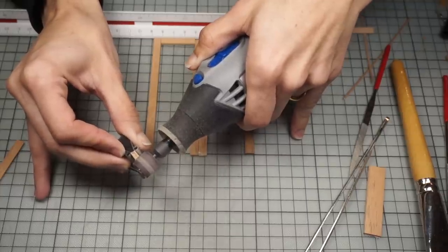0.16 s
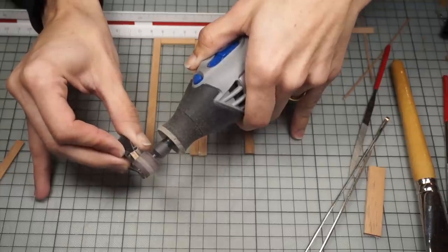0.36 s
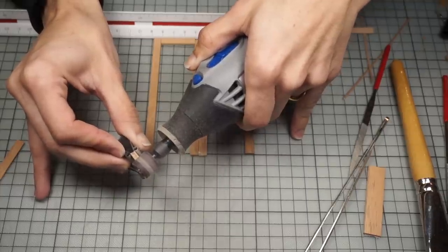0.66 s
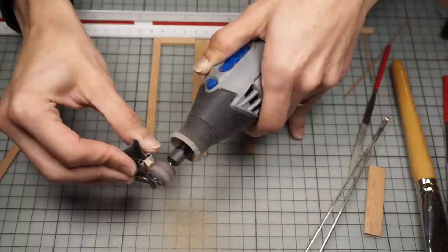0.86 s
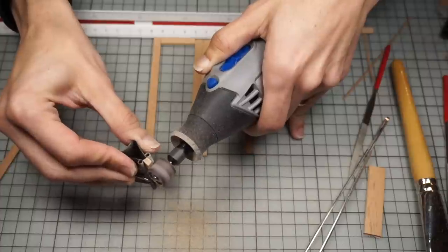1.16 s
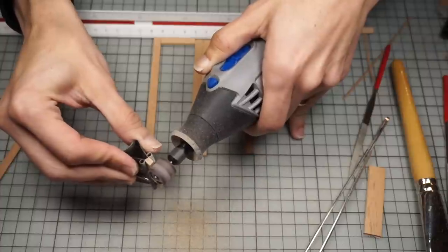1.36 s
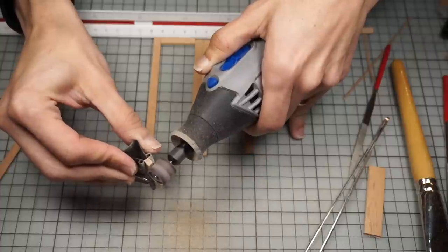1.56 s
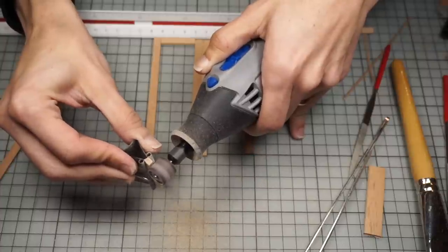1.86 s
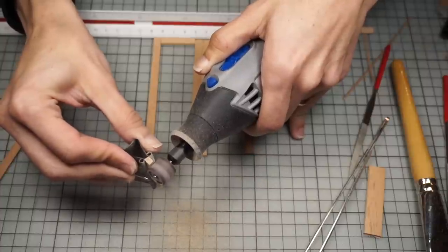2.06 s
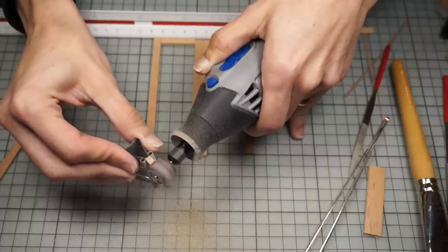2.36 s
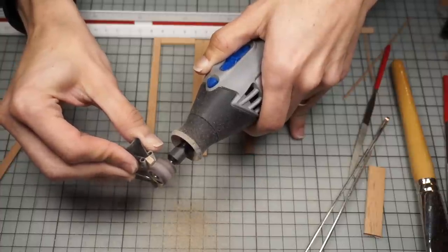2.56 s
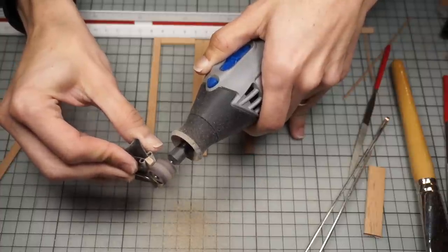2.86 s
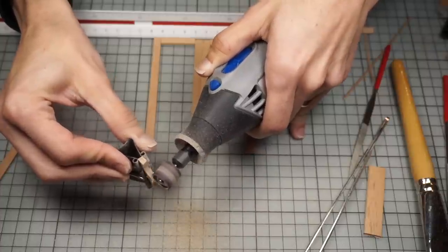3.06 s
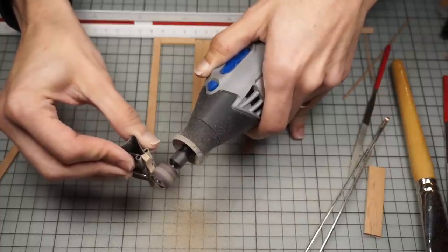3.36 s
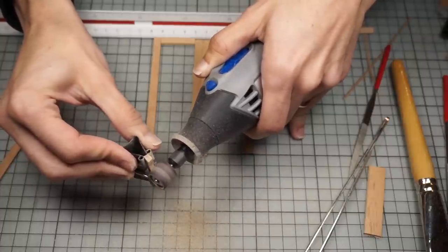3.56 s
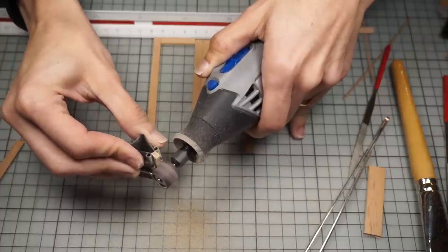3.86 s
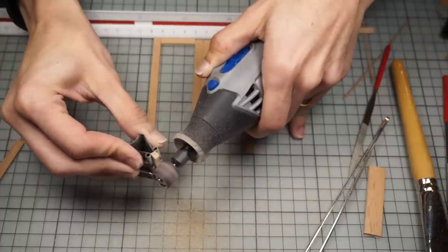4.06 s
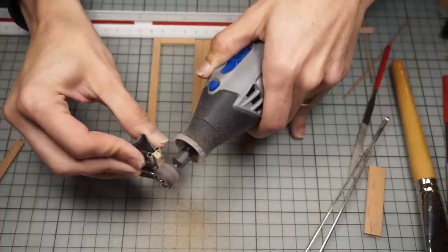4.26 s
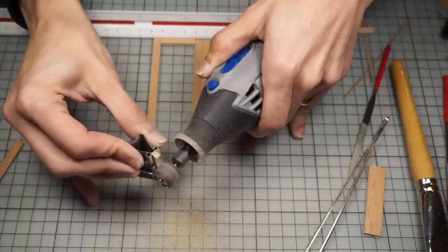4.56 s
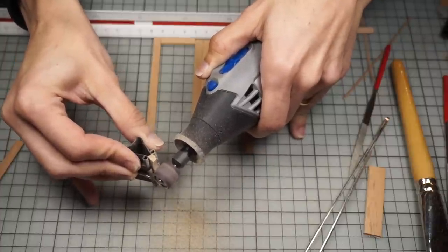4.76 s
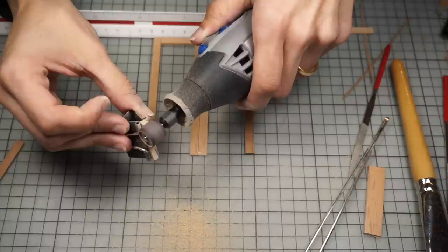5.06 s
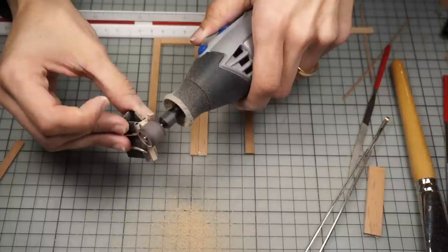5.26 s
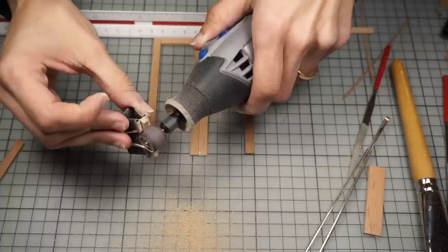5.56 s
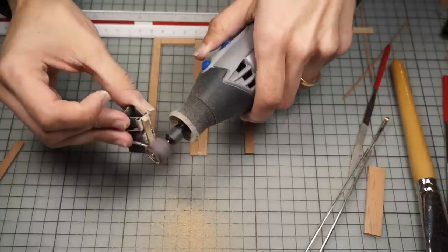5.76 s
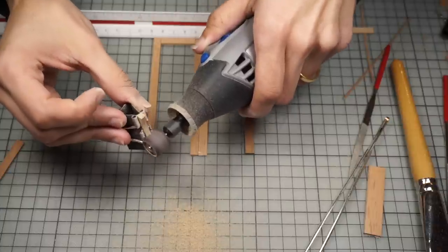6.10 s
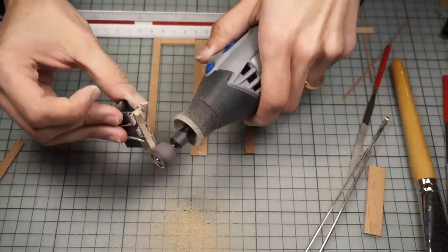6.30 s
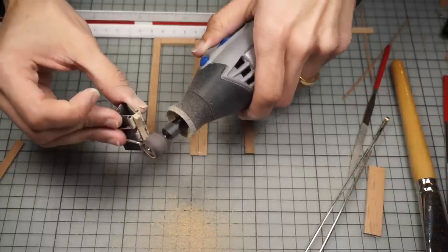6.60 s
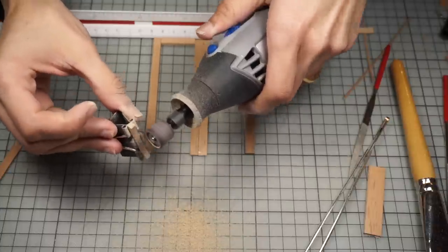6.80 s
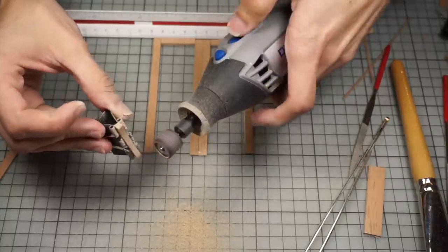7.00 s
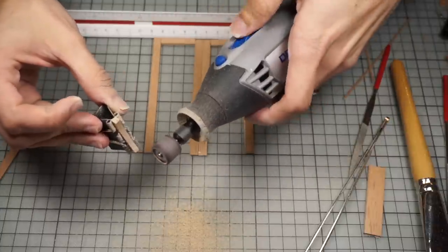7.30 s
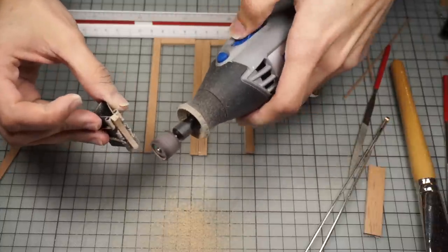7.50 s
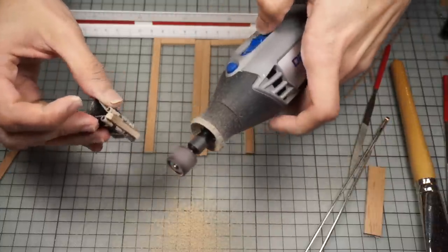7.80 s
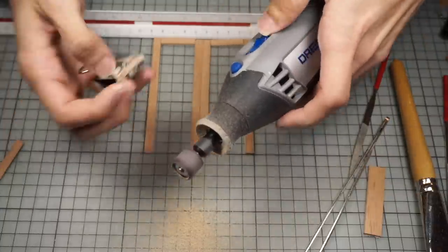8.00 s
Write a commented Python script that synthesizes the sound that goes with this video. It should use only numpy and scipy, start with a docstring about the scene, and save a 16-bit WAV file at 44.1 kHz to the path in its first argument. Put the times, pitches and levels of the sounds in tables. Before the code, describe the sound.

Close by and somewhat left, in a quiet room, a small electric rotary tool grinds a piece of wood. Its buzzing motor dips and climbs under firm presses while the drum hisses, scrapes and briefly squeaks. After some lighter, higher-pitched touches the sanding stops, leaving a bright whine. Near the end the switch clicks off and the whine starts falling.

```python
"""A mains rotary tool sands a small wooden part, hand-held over a desk; chopped mains makes it buzz.
The drum's grit comes round every turn, hissing and ringing the part. At 0.77 s the tone changes abruptly.
Hard presses slow the motor and make the part chatter and squeal; from 5.1 s the touches are lighter.
At 6.8 s the drum runs free and the motor whines. At 7.6 s it is switched off and starts to coast down."""
import sys
import numpy as np
from scipy import signal
from scipy.fft import rfft, irfft, next_fast_len
from scipy.io import wavfile
from scipy.ndimage import uniform_filter1d

SR = 44100
rng = np.random.default_rng(int(sys.argv[2]) if len(sys.argv) > 2 else 0)


def store_wav(level_fs):
    """Save 16-bit WAV to argv[1]."""
    pcm = np.round(np.clip(np.atleast_2d(level_fs), -1, 1) * 32767)
    wavfile.write(sys.argv[1], SR, pcm.T.astype(np.int16))


N = 358974
TIME = np.arange(N) / SR
PADDED = next_fast_len(N + SR // 2)
FREQS = np.maximum(np.arange(PADDED // 2 + 1) * SR / PADDED, 1)
MAINS_HZ = 50
TONE_CHANGE_S, FREE_S, FREE_FADE_S, SWITCH_OFF_S = 0.77, 6.835, 0.09, 7.61
COAST_S = np.maximum(TIME - SWITCH_OFF_S, 0)


def from_db(db):
    """dB to gain."""
    return 10 ** (np.asarray(db) / 20)


def rms_one(x):
    """Scale to rms 1."""
    return x / np.sqrt(np.mean(x ** 2) + 1e-20)


def evened(x):
    """Hold the running power near 1."""
    return x / np.sqrt(np.maximum(uniform_filter1d(x ** 2, 3000), 1e-12))


def drift(rate_hz):
    """Random curve, rms 1."""
    knots = rng.standard_normal(int(N / SR * rate_hz) + 2)
    return rms_one(np.interp(TIME * rate_hz, np.arange(len(knots)), knots))


def after(t_s, fade_s=0.02):
    """Ramp 0 to 1, centred on t_s."""
    return np.clip((TIME - t_s) / fade_s + .5, 0, 1)


def over_hz(points):
    """Interpolate on log frequency."""
    hz, value = np.transpose(points)
    return np.interp(np.log(FREQS), np.log(hz), value)


def filtered(x, gain_db):
    """Apply a gain per frequency."""
    return irfft(rfft(x, PADDED) * from_db(gain_db), PADDED)[:N]


def coloured(x, spectrum):
    """Shape by a spectrum with 60 dB/octave skirts; rms 1."""
    octaves_below = np.maximum(np.log2(spectrum[0][0] / FREQS), 0)
    octaves_above = np.maximum(np.log2(FREQS / spectrum[-1][0]), 0)
    return rms_one(filtered(x, over_hz(spectrum) - 60 * (octaves_below + octaves_above)))


def ringing(force, hz, width_hz):
    """One resonance; rms 1."""
    r = np.exp(-np.pi * width_hz / SR)
    return rms_one(signal.lfilter([1, 0, -1], [1, -2 * r * np.cos(2 * np.pi * hz / SR), r * r], force))


def surface(turns, wear_rad, patchy_db=3.2, memory=0.92, points=512):
    """Rough track that repeats each turn and slowly wears; order = multiple of the spindle speed."""
    orders = np.arange(80)
    steps, swells = rng.standard_normal((2, int(turns[-1]) + 2, len(orders)))
    angles = 2 * np.pi * rng.random(len(orders)) + np.cumsum(steps * wear_rad * np.sqrt(orders), axis=0)
    heights = from_db(patchy_db * rms_one(signal.lfilter([1], [1, -memory], swells, axis=0)))
    track = irfft(heights * np.exp(1j * angles) * (orders > 0), points, axis=1).ravel()
    return rms_one(np.interp(turns * points, np.arange(len(track)), track))


def rubbing(turns, share, wear_rad):
    """Friction force: a share of the power repeats each turn, the rest is noise."""
    return np.sqrt(share) * surface(turns, wear_rad) + np.sqrt(1 - share) * rng.standard_normal(N)


def chopped(depth_db, firing=0.013, rise=0.13, fall=0.18):
    """Gain pulse from the current, once per mains half wave (times in half waves); mean power 1."""
    age = (2 * MAINS_HZ * TIME - firing) % 1
    pulse = np.minimum(age / rise, 1) * np.exp(-(np.maximum(age - rise, 0) / fall) ** 2)
    gain = from_db(depth_db * pulse)
    return gain / np.sqrt(uniform_filter1d(gain ** 2, SR // MAINS_HZ))


def rotor_tone(turns, order, ripple_rad, wobble_rad):
    """One order, swung in phase by the pulsing torque."""
    swing = ripple_rad * np.sin(2 * np.pi * 2 * MAINS_HZ * TIME) + wobble_rad * drift(60)
    return np.sqrt(2) * np.sin(2 * np.pi * order * turns + swing)


def spindle_hz(friction_hz_per_s=153):
    """Speed sags under load; unpowered, friction runs it down evenly."""
    # powered speed: t/s, f/Hz
    speeds = [(0, 151.9), (0.325, 150.3), (0.55, 152.4), (0.65, 151.2), (0.765, 153.7), (0.78, 160.3),
              (0.875, 160.2), (1.0, 174.8), (1.15, 183.2), (1.275, 184.1), (1.4, 178.0), (1.5, 169.6),
              (1.625, 161.9), (1.75, 155.9), (1.825, 155.7), (1.9, 152.5), (2.075, 149.1), (2.175, 149.4),
              (2.25, 152.4), (2.375, 153.9), (2.65, 150.2), (2.725, 151.6), (2.8, 150.0), (2.95, 152.9),
              (3.0, 156.2), (3.05, 161.2), (3.125, 171.5), (3.25, 180.2), (3.425, 184.9), (3.5, 183.8),
              (3.7, 171.8), (3.85, 164.5), (4.1, 161.6), (4.25, 162.6), (4.5, 168.1), (4.675, 164.9),
              (4.825, 168.5), (5.085, 171.8), (5.1, 191.8), (5.475, 192.4), (5.8, 190.3), (5.975, 191.9),
              (6.275, 186.7), (6.65, 193.6), (6.725, 192.0), (7.25, 197.6), (7.61, 197.9)]
    return np.interp(TIME, *np.transpose(speeds)) - friction_hz_per_s * COAST_S


def effort(speed_hz, free_hz=194.7, slow_hz=147, full_hz_per_s=44):
    """Motor labour and acceleration, both 0-1."""
    labour = np.clip((free_hz - speed_hz) / (free_hz - slow_hz), 0, 1) * (1 - after(SWITCH_OFF_S))
    pickup = np.clip(np.gradient(speed_hz) * SR / full_hz_per_s, 0, 1)
    return labour, uniform_filter1d(pickup, 4000)


def pressing(idle_ring_db=-45.5, idle_hiss_db=-48, idle_bite_db=12.5):
    """Base curves from the hand's pressure; bite is the chop depth, of which each layer takes a share."""
    # part on drum: start/s, end/s, attack/s, release/s, contact/0-1, ring/dB, first grit/dB,
    # last grit/dB, housing boost/dB, chatter/dB re ring, bite/dB
    presses = [(-0.1, 0.771, .02, 0.018, 0.55, -40.5, -37, -37, 3, -28, 9),
               (0.771, 0.962, 0.019, 0.023, 0.9, -39, -40.5, -40, 2, 0, 7),
               (1.148, 2.146, 0.011, 0.071, 0.82, -38.5, -41.5, -39, 1.5, -1, 9),
               (2.146, 2.974, 0.055, 0.05, 0.8, -40, -40.5, -40, 1, -43, 3),
               (2.97, 3.072, 0.045, 0.019, 0.9, -35.5, -41.5, -36, 1.5, -4, 7),
               (3.407, 4.325, 0.096, 0.23, 0.92, -38.5, -38, -39, 0.5, -8, 0),
               (4.37, 5.08, 0.2, .012, 0.84, -37.5, -41, -42.5, -.5, -13.5, 5),
               (5.085, 5.5, .012, 0.12, 0.27, -45, -44.5, -46.5, -0.5, -2.5, 13),
               (5.533, 5.836, 0.26, 0.13, 0.12, -43, -41, -43, -0.5, -5, 14),
               (5.912, 6.16, .04, 0.031, 0.08, -42, -42.5, -44.5, 1.5, -3.5, 14.5),
               (6.15, 6.283, 0.13, 0.06, 0.5, -37, -41.5, -39.5, 1.5, -8, 14),
               (6.62, 6.713, .03, 0.062, 0.34, -43.5, -44, -41.5, 2, -9, 15)]
    resting = 0.22 * (1 - after(FREE_S, FREE_FADE_S))   # light contact between presses
    contact, boost_db, judder = resting, 0, 0
    ring_db, grit_db, bite_db = idle_ring_db, idle_hiss_db, idle_bite_db
    for start, end, attack, release, firm, ring, first, last, boost, chatter_db, bite in presses:
        on = after(start, attack) * (1 - after(end, release))
        contact = contact + on * (firm - resting)
        ring_db += on * (ring - idle_ring_db)
        grit_db += on * (np.interp(TIME, [start, end], [first, last]) - idle_hiss_db)
        boost_db += on * boost
        judder += on * from_db(ring + chatter_db)
        bite_db += on * (bite - idle_bite_db)
    return np.clip(contact, 0, 1), ring_db, grit_db, boost_db, judder, bite_db


def rumble():
    """Faint low stereo background."""
    # spectrum: f/Hz, level/dB
    spectrum = [(15, -46), (25, -1), (113, -2.5), (171, 5.5), (236, -5), (300, 6.5), (390, -27),
                (660, -120)]
    centre, sides = (coloured(rng.standard_normal(N), spectrum) for _ in range(2))
    return from_db(-74) * (centre + .45 * sides * [[1], [-1]])


def room(x, t60_s=0.61, wet_db=-15, spill_db=-19):
    """Diffuse desk and wall reflections, spilling across channels."""
    tail = rng.standard_normal((2, SR // 2)) * from_db(-60 * TIME[:SR // 2] / t60_s)
    tail /= np.sqrt(np.sum(tail ** 2, axis=1, keepdims=True))
    direct = rfft(x, PADDED)
    reflected = from_db(wet_db) * direct + from_db(spill_db) * direct[::-1]
    return irfft(direct + reflected * rfft(tail, PADDED), PADDED)[:, :N]


def off_centre(x):
    """The tool lies to the left: the sides differ in level and phase."""
    # left minus right: f/Hz, level/dB
    balance = [(100, -0.5), (340, 0.5), (600, 2), (1080, 4.5), (1900, 3.5), (2700, 7.5), (4300, 13),
               (5100, 11.5), (6200, 16.5), (10500, 15.5)]
    # left lead: f/Hz, phase/rad
    lead = [(60, -0.45), (250, -1.3), (520, -1.64), (2500, -1.31), (3790, -1.7), (4820, -1.46),
            (7060, -1.2), (11000, -1.3)]
    sides = np.array([[.5], [-.5]])
    gains = from_db(sides * over_hz(balance)) * np.exp(1j * sides * over_hz(lead))
    return irfft(rfft(x, PADDED) * gains / np.abs(gains.mean(axis=0)), PADDED)[:, :N]


def hum(turns, speed_hz, early_db=-73, late_db=-84):
    """Magnetic hum: mains overtones, some shifted by the rotor, until power-off."""
    # hum lines: order, plus mains multiple, level/dB
    lines = [(1, 2, -78.5), (1, 4, -66), (0, 8, -73), (0, 12, -73), (0, 14, -65)]
    powered = 1 - after(SWITCH_OFF_S)
    current = powered * (speed_hz.mean() / speed_hz) ** 2.5   # a slowed motor draws more
    drone_db = early_db + (late_db - early_db) * after(TONE_CHANGE_S, .05)
    out = from_db(drone_db) * powered * np.sin(2 * np.pi * 2 * MAINS_HZ * TIME)
    for order, mains, db in lines:
        tone = np.sin(2 * np.pi * (order * turns + mains * MAINS_HZ * TIME))
        out += from_db(db + 2 * drift(3.7)) * tone * current
    return np.sqrt(2) * out


def switch(level_db=-38, t60_s=0.055):
    """The slide switch snaps off."""
    # tick spectrum: f/Hz, level/dB
    spectrum = [(1500, -11), (8300, -5), (9200, 6), (10200, -3)]
    tick = coloured(rng.standard_normal(N), spectrum)
    return tick * (TIME > SWITCH_OFF_S) * from_db(level_db - 60 * COAST_S / t60_s)


def fan(turns, contact, bite_db):
    """Rush of fan air, pulsed by the current; power 1."""
    # air spectrum: f/Hz, level/dB
    spectrum = [(150, -19), (300, -17.5), (450, -11.5), (620, -6), (880, -1.5), (1050, -6), (1450, 0.5),
                (1950, -20)]
    air = rubbing(turns, 0.11 + 0.2 * contact, wear_rad=0.087) * chopped(0.14 * bite_db)
    return evened(coloured(air, spectrum))


def housing(turns, contact, bite_db):
    """The rotor shakes the housing in bursts; its colour shifts abruptly at 0.77 s."""
    # housing response before and after 0.77 s: f/Hz, level/dB
    early_tone = [(1180, -23), (2000, -5), (2100, -2), (2380, 2), (2540, -32), (2700, -2), (2860, -14),
                  (3300, -21), (4290, -41), (7260, -120)]
    late_tone = [(1210, -55), (2050, -1.5), (2200, 4), (2380, 4), (2690, 0), (2800, 1.5), (3080, -8.5),
                 (3300, -21), (4290, -28), (7260, -120)]
    force = rubbing(turns, 0.11 + 0.42 * contact, wear_rad=0.039)
    changed = after(TONE_CHANGE_S)
    shake = (1 - changed) * coloured(force, early_tone) + changed * coloured(force, late_tone)
    return evened(shake) * chopped(0.34 * bite_db)


def buzz(turns, labour, boost_db, sweep_hz=1150):
    """Each current burst sounds the 16th order as a falling chirp through the housing."""
    # housing response before and after 0.77 s: f/Hz, level/dB
    early_tone = [(1900, -9), (2110, 6), (2220, 2.5), (2420, 1.5), (2520, -19), (2620, 0.5), (2720, 0),
                  (2830, -15), (3300, -18)]
    late_tone = [(2000, 5), (2300, -11.5), (2450, 0.5), (2560, -4), (2720, 4), (2850, -1.5), (2970, -5),
                 (3100, -15.5), (3400, -7.5)]
    # overtones at full labour: order, level/dB
    overtones = [(24, -52.5), (32, -53.5)]
    age = (2 * MAINS_HZ * TIME - 0.17 + .5) % 1 - .5   # half waves from mid-burst
    swing = -np.pi * sweep_hz * age ** 2 / (2 * MAINS_HZ) + 0.23 * drift(70)
    chirp = np.sin(2 * np.pi * 16 * turns + swing)
    bursts = rms_one(np.exp(-(age / 0.24) ** 2) * from_db(1.5 * drift(40)) * chirp)
    changed = after(TONE_CHANGE_S)
    out = (1 - changed) * filtered(bursts, over_hz(early_tone))
    out += changed * filtered(bursts, over_hz(late_tone))
    out *= from_db(-48.5 + 9.5 * labour + boost_db)
    for order, db in overtones:
        out += from_db(db) * labour * rotor_tone(turns, order, 0.8, 1.2) * chopped(6.0)
    return out * (1 - after(SWITCH_OFF_S))


def whine(turns, speed_hz, bite_db, corner_hz=1990):
    """Rotor slots pass 12 times a turn, commutator edges 24; both swell once the drum runs free."""
    # commutator tones: order, level/dB re edges_db, coasting fall/(dB/s)
    overtones = [(24, 1.5, 51), (25, -20, 40), (32, -13, 33), (33, -9, 40), (47, -5.5, 41), (48, -4, 23),
                 (49, -2.5, 12), (56, -36, 15), (63, -15, 6), (62, -9, -3), (67, -12, 4)]
    # low rotor tones: order, loaded/dB, free/dB, coasting fall/(dB/s)
    rotor = [(1, -84, -67.5, 17), (8, -53.5, -48.5, 156), (9, -56.5, -58, 150)]
    free = after(FREE_S, FREE_FADE_S)
    damped_db = -16 * (1 - free)
    octaves_below = np.maximum(np.log2(corner_hz / (12 * speed_hz)), 0)   # housing radiates little there
    slots_db = -39.5 + damped_db - np.minimum(120 * octaves_below, 20)
    edges_db = -50.5 + damped_db
    angle = 2 * np.pi * turns + 0.015 * drift(50)
    angle += 0.028 * after(SWITCH_OFF_S, 0.061) * drift(250)   # coasting is less even
    out = from_db(slots_db + .7 * drift(25)) * np.sin(12 * angle)
    for order, db, fall in overtones:
        gain = from_db(edges_db + db - fall * COAST_S + drift(25))
        out += gain * np.sin(order * angle + 2 * np.pi * rng.random())
    for order, load_db, free_db, fall in rotor:
        gain = from_db(load_db + free * (free_db - load_db) - fall * COAST_S + drift(20))
        out += gain * np.sin(order * angle)
    return np.sqrt(2) * out * chopped(0.41 * bite_db)


def brushes(turns, force, contact, bite_db):
    """Motor brushes hiss, and whistle with the bite until the drum runs free."""
    # hiss spectrum: f/Hz, level/dB
    spectrum = [(1820, -25), (3100, -5.5), (3500, -5), (3800, -7.5), (4260, -9.5), (4440, -2.5),
                (5020, -6.5), (6270, -3.5), (8000, -6), (8900, -3.5), (11000, -13), (14300, -100)]
    sparks = rotor_tone(turns, 24, 0.98, 1.6) + .5 * rotor_tone(turns, 32, 0.42, 1.0)
    draw = (bite_db / bite_db.max()) ** 2 * (1 - after(FREE_S, FREE_FADE_S))
    whistle = 0.98 * draw * (1 - contact) * sparks * chopped(0.61 * bite_db)
    return coloured(force, spectrum) + whistle


def grit(force):
    """Grit rasps the wood; after 0.77 s high modes swell and fade as the contact spot moves."""
    # rasp spectrum before and after 0.77 s: f/Hz, level/dB
    early_tone = [(1820, -32), (3100, 8), (3360, -20), (3520, -1), (3750, -2), (4020, -20), (4840, -5),
                  (5520, -8), (6790, -18), (7280, 5.5), (8710, -15), (9580, 7), (11000, -5.5), (14300, -54)]
    late_tone = [(1820, -9), (3100, 5.5), (3850, -8.5), (4240, 0.5), (5160, 2), (5950, -1.5), (7430, 0),
                 (8440, 0), (9240, -1.5), (10100, 2), (11000, -13), (14300, -89)]
    # modes of the part and its metal clip: f/Hz, level/dB re plain rasp
    modes = [(4240, -14.5), (4800, -17.5), (5230, -13), (6300, -19.5), (7020, -10.5), (7600, -14.5),
             (8200, -14.5), (8700, -23), (9820, -15)]
    rasp = coloured(force, late_tone)
    for hz, db in modes:
        rasp += from_db(db + 4.5 * drift(11)) * ringing(force, hz, width_hz=200)
    changed = after(TONE_CHANGE_S)
    return (1 - changed) * coloured(force, early_tone) + changed * rms_one(rasp)


def scrapes(turns, fade_s=0.018):
    """An edge scrapes; the contact spot picks which high resonance rings."""
    # edge scrapes: start/s, end/s, f/Hz, width/Hz, level/dB
    events = [(0.776, 0.88, 4360, 200, -49.5), (1.15, 1.21, 6940, 260, -45.5),
              (1.19, 1.25, 5170, 400, -42.5), (1.48, 1.76, 7240, 380, -51), (2.187, 2.58, 8400, 400, -48.5),
              (2.7, 2.902, 7200, 300, -45.5), (3.0, 3.066, 2730, 600, -39.5),
              (3.43, 3.57, 4890, 300, -43.5), (3.55, 3.68, 9800, 400, -48), (3.76, 3.84, 7680, 300, -44),
              (3.842, 4.03, 5220, 110, -45.5), (4.12, 5.08, 5240, 130, -52.5),
              (4.92, 5.08, 10500, 700, -48), (4.43, 4.58, 6170, 160, -53), (4.494, 5.073, 7650, 380, -50),
              (6.134, 6.28, 3700, 400, -49), (6.194, 6.25, 4350, 240, -46), (6.68, 6.726, 4400, 240, -48.5)]
    force = rubbing(turns, 0.83, wear_rad=0.1136)
    out = np.zeros(N)
    for start, end, hz, width, db in events:
        band_db = -10 * np.log10(1 + (2 * (FREQS - hz) / width) ** 4)
        gate = after(start, fade_s) - after(end, fade_s)
        out += gate * from_db(db) * evened(filtered(force, band_db))
    return out * from_db(-2 * drift(30))


def rough_tone(turns, order, rough, flutter_db):
    """One order, with a share of its power in random jitter."""
    jitter = np.sqrt(rough / 2) * (drift(110) + 1j * drift(110))
    wave = (np.sqrt(1 - rough) + jitter) * np.exp(2j * np.pi * order * turns)
    return from_db(flutter_db * drift(18)) * np.sqrt(2) * wave.real


def chatter(turns, speed_hz, judder, bite_db, fade_s=0.026):
    """The part slips unevenly; orders swell as they cross its resonances. Held tones sound on top."""
    # part resonances: f/Hz, width/Hz, level/dB
    modes = [(642, 123, -14.5), (1540, 53, -8), (1850, 194, -7.5)]
    # brief squeals and a low steady rotor hum: start/s, end/s, order, level/dB, roughness/0-1
    held_tones = [(0, 0.599, 6, -50, 0), (0, 0.764, 12, -47, 0.2), (0, 0.76, 13, -43.5, 0.54),
                  (0.535, 0.587, 13, -34, 0.54), (0.89, 0.915, 11, -35, 0.15), (1.15, 1.276, 10, -50, 0.25),
                  (1.16, 1.493, 9, -42.5, 0.4), (1.523, 1.917, 12, -45, 0.25), (1.498, 2.136, 6, -50, 0.06),
                  (2.067, 2.123, 12, -41, 0.2), (2.25, 2.503, 16, -37.5, 0.02),
                  (3.022, 3.066, 11, -31, 0.03), (3.468, 3.606, 10, -41, 0.25),
                  (3.603, 3.74, 9, -42.5, 0.2), (3.64, 3.832, 11, -45.5, 0.25),
                  (3.868, 4.27, 7, -44.5, 0.1), (4.013, 4.294, 6, -48.5, 0), (3.62, 4.68, 4, -59, 0.3),
                  (4.035, 4.336, 11, -41, 0.35), (4.718, 5.08, 11, -42.5, 0.5),
                  (5.085, 6.195, 4, -54, 0.08), (5.085, 7.1, 3, -60, 0.1), (6.633, 6.688, 9, -37.5, 0.12)]
    out = np.zeros(N)
    for order in range(3, 14):
        tone_hz = order * speed_hz
        response = sum(from_db(db) / (1 + (2 * (tone_hz - hz) / width) ** 4) for hz, width, db in modes)
        out += judder * response * rough_tone(turns, order, rough=0.022 * order, flutter_db=2.5)
    for start, end, order, db, rough in held_tones:
        gate = after(start, fade_s) - after(end, fade_s)
        out += gate * from_db(db) * rough_tone(turns, order, rough, flutter_db=2)
    return out * chopped(0.28 * bite_db)


def sanding(turns, contact, bite_db, ring_db, grit_db):
    """The drum rings the part; with contact, brush hiss gives way to grit."""
    # part response: f/Hz, level/dB
    response = [(820, -54), (1400, -15.5), (1650, -0.5), (1810, 1), (2000, 2.5), (2150, -8), (2800, -57)]
    drive = rubbing(turns, 0.73 * contact, wear_rad=0.0659) * chopped(0.068 * bite_db)
    ring = coloured(drive, response)
    runout = from_db(1.5 * np.cos(2 * np.pi * turns) + 0.65 * drift(60))   # drum slightly out of true
    force = rubbing(turns, 0.36 + 0.29 * contact, wear_rad=0.056) * runout
    hiss = contact * grit(force) + (1 - contact) * brushes(turns, force, contact, bite_db)
    return from_db(ring_db - 2) * evened(ring) + from_db(grit_db - 0.07) * evened(hiss)


def run_down_db(fall_db_per_s):
    """Power-off loss: 1 dB at once, then a steady fall."""
    return after(SWITCH_OFF_S, .03) + fall_db_per_s * COAST_S


def scene():
    """One spindle drives tool and part; presses and motor effort set the levels."""
    speed_hz = spindle_hz()
    turns = np.cumsum(speed_hz) / SR
    contact, ring_db, grit_db, boost_db, judder, bite_db = pressing()
    labour, pickup = effort(speed_hz)
    bite_db += 7 * pickup * (1 - contact)
    fan_db = -48.4 + 2 * contact - run_down_db(14.5)
    housing_db = -46.5 + 2.5 * labour + boost_db - run_down_db(19)
    housing_db += contact * drift(13)   # unsteady hands
    ring_db += 1.5 * contact * drift(13) - run_down_db(23)
    grit_db -= 3 * labour * (1 - contact) ** 2 + run_down_db(14)   # slow brushes hiss less
    tool = from_db(fan_db) * fan(turns, contact, bite_db)
    tool += from_db(housing_db) * housing(turns, contact, bite_db)
    tool += buzz(turns, labour, boost_db) + whine(turns, speed_hz, bite_db)
    tool += hum(turns, speed_hz) + switch()
    work = sanding(turns, contact, bite_db, ring_db, grit_db)
    work += scrapes(turns) + chatter(turns, speed_hz, judder, bite_db)
    return rumble() + room(off_centre(tool + work))


def record(dry, cutoff_hz=11100):
    """Steep low-pass."""
    return irfft(rfft(dry, PADDED) / np.sqrt(1 + (FREQS / cutoff_hz) ** 600), PADDED)[:, :N]


dry = scene()
out = record(dry)
store_wav(out)
```